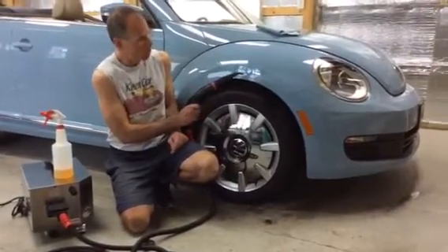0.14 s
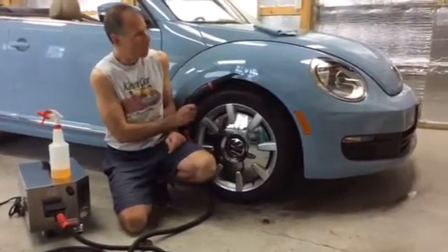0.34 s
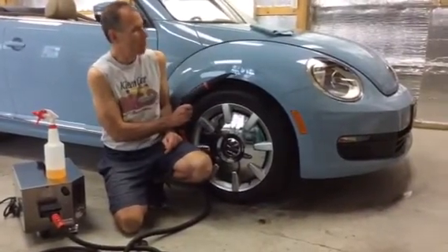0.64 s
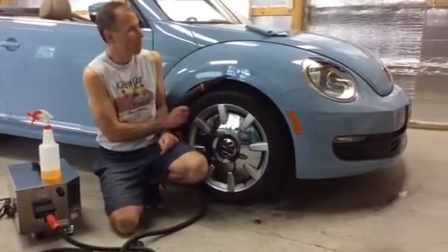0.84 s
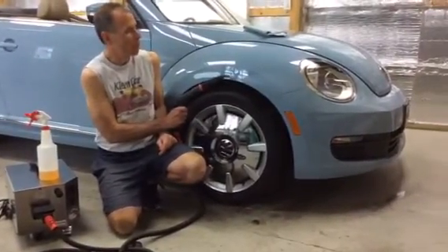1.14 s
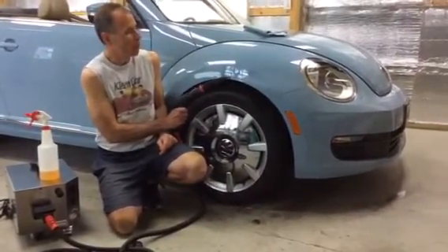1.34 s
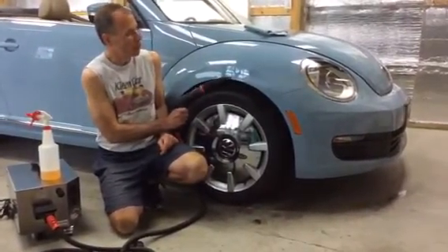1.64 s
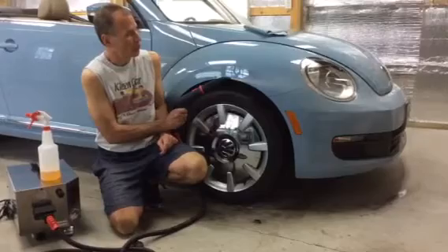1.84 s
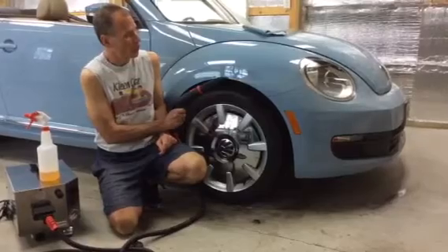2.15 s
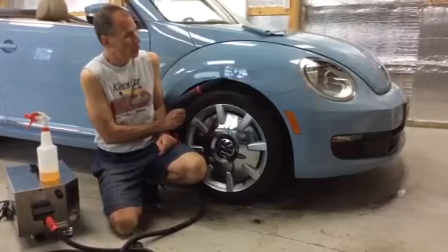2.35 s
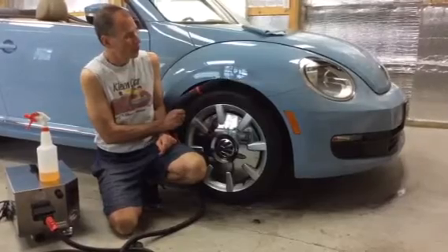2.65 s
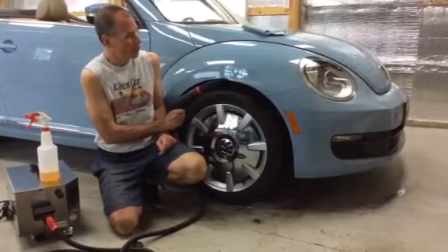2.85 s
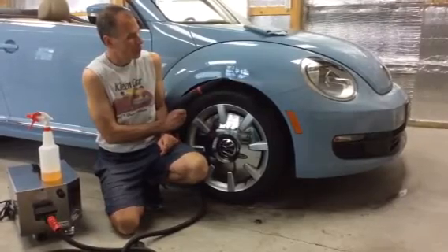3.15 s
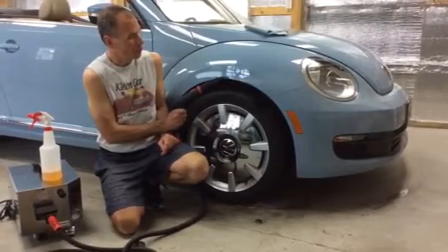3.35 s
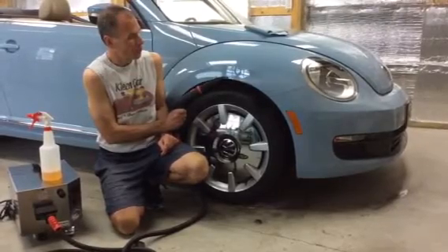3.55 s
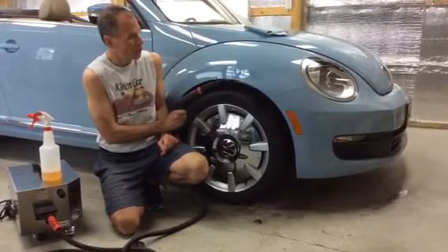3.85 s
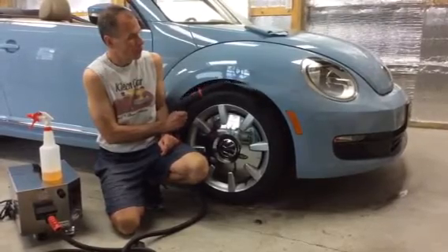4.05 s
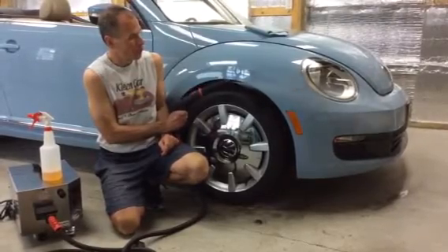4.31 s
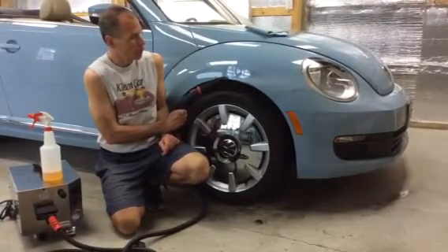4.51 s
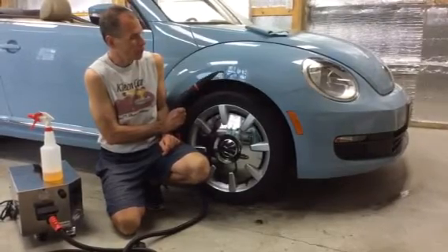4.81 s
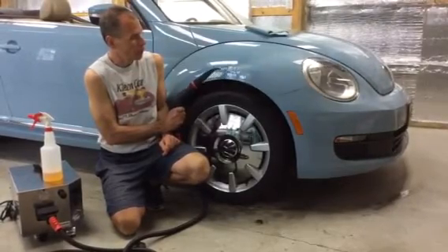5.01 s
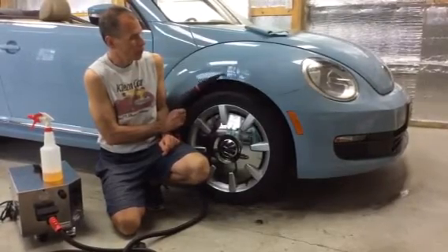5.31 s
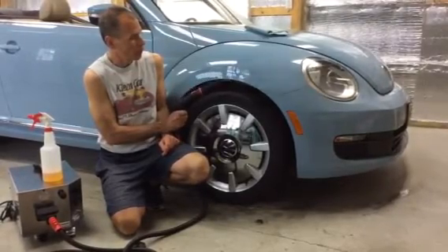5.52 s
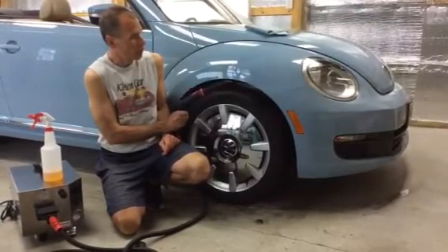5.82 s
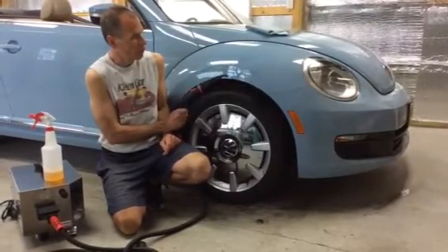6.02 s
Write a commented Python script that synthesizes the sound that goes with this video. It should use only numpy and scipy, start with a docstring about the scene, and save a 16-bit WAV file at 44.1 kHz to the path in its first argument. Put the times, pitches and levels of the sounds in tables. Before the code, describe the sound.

A steam cleaner nozzle hisses hard and high inside a car's wheel arch for about six seconds, sputtering slightly, its spray ringing on metal above a softer airy roar. A faint garage rumble lies underneath. In the first half second, air spilling from the arch thuds lightly on the microphone. From about 0.8 seconds the tone of the hiss drifts as the nozzle moves, and the flow surges and sags, with brief dips near 1.4, 1.8, 3 and 4.5 seconds. Harder thuds hit the microphone around 3.6 seconds. From 4.8 to 5.5 seconds strong gusts rumble and flutter on it, broken at 5 seconds by the deepest dip in the steam; right after that the hiss is at its loudest. One more gust buffets the microphone at 6 seconds, with the steam still hissing to the end.

```python
"""A steam lance hisses inside a car's wheel arch in a garage, its spray ringing on the metal. At first
the draught spilling from the arch thuds lightly on a microphone. From about 0.8 s the colour drifts as
the lance moves, and the flow surges and sags. Harder thuds come near 3.6 s. Around 5 s strong gusts
rumble, broken by the deepest sag, and the hiss peaks. One more gust comes at 6 s, just before the end."""
import sys
import numpy as np
from scipy import signal
from scipy.fft import rfft, irfft, next_fast_len
from scipy.io import wavfile
from scipy.ndimage import uniform_filter1d, map_coordinates

SR = 44100
rng = np.random.default_rng(int(sys.argv[2]) if len(sys.argv) > 2 else 0)


def put_to_file(sound):
    """Save the sound as 16-bit audio at rate SR, in the file named by the first command-line argument."""
    columns = np.atleast_2d(sound).T  # one column per channel
    safe = np.clip(columns, -1, 1)
    whole_steps = np.round(safe * 32767)
    wavfile.write(sys.argv[1], SR, whole_steps.astype(np.int16))


N = 272097

# How loud the steam's three sounds are: time_s, nozzle_db, spray_db, roar_db
STEAM_LEVELS = [(0, -25.5, -36.5, -48.5), (.15, -22.5, -32, -45.5), (.65, -24, -32, -45),
                (.8, -23.5, -30, -40.5), (.92, -23.5, -30.5, -39.5), (1.05, -24, -31, -44.5),
                (1.35, -22.5, -30, -40), (1.7, -24, -29, -39), (2.2, -22.5, -29.5, -42),
                (2.6, -24, -31, -45), (3.2, -23, -28.5, -38), (3.5, -22.5, -29, -42),
                (3.9, -24, -32.5, -46.5), (4.2, -24.5, -28.5, -42.5), (4.35, -23, -28, -41.5),
                (4.6, -23.5, -28, -39), (4.85, -20.5, -29, -39.5), (5.22, -19.5, -28, -38),
                (5.42, -22, -31, -39), (5.55, -25.5, -32, -45), (5.82, -23.5, -29.5, -43.5),
                (5.98, -25, -34, -48.5), (6.08, -22, -31.5, -42), (6.17, -22.5, -31, -40.5)]
# Moments when the sound sags, as the flow falters or the lance swings off the metal: deepest_s, nozzle_loss_db,
# spray_loss_db, draught_loss_db, recovery_s
SAGS = [(.62, .5, 1.5, 0, .05), (.81, 2.5, -0.5, 6, 0.048), (1.1, 0.5, 4, 2, 0.048),
        (1.42, 6, 4.5, 15, 0.12), (1.76, 4.5, 3.5, 10, 0.045), (1.82, 4.5, 3.5, 15, 0.073),
        (2.27, 2, 6.5, 8, 0.077), (2.47, 1.5, 4.5, 3, 0.049), (2.63, 0, 0.5, 6, 0.02),
        (2.8, 1.5, 4, 0, 0.016), (2.95, 9, 4, 20, 0.094), (3.24, 3, 0, 24, 0.15),
        (3.92, 1, 3.5, 2, 0.053), (4.51, 4.5, 4.5, 17, .09), (4.62, 3, 1.5, 10, 0.045),
        (4.968, 12.5, 9, 27, 0.12), (5.1, 5.5, 2.5, 9, 0.048), (5.51, 2, 2.5, 4, 0.034),
        (5.63, 1, 3, 2, 0.07), (5.96, 0.5, 1, 3, .06)]
# Colour (the mix of low and high pitches) of the nozzle's hiss: pitch_hz, level_db
NOZZLE_COLOUR = [(4120, -36.5), (7000, -10), (7820, -3), (9460, -2.5), (10500, -4.5), (14100, -5.5),
                 (15300, -8.5)]
# Colour of the spray, one list for each metal part it hits: pitch_hz, level_db
SPRAY_COLOURS = [
    [(1530, -31), (2600, -10), (3070, -6.5), (3430, -2.5), (3710, -3), (4030, -1), (5300, -2), (5670, 0.5),
     (7000, -4), (9100, -26), (15400, -120)],
    [(1530, -46), (2600, -9), (3070, -5), (3380, 0.5), (3710, -1.5), (4000, -1), (4780, -3), (5410, -1),
     (7000, -3), (9100, -26), (15400, -120)],
    [(1530, -25.5), (2600, -11.5), (2770, -4.5), (3090, -9.5), (3380, -4), (3920, -5.5), (4220, 0),
     (4570, -4.5), (4900, -0.5), (5500, -4.5), (7000, -5), (9100, -12), (15400, -120)],
    [(1530, -29), (2600, -11), (2900, -8.5), (3210, -10.5), (3430, -5.5), (4070, -4), (4420, 1), (4800, -8),
     (5090, 2), (5410, -3), (5880, 0), (7000, -8.5), (9100, -34), (15400, -120)],
]
# Where the lance points: start_s, part_number
LANCE_AIM = [(0, 0), (.77, 1), (1.42, 2), (3.93, 3), (4.5, 0), (5.62, 3), (5.97, 0)]
# Colour of the roar in the arch: pitch_hz, level_db
ROAR_COLOUR = [(350, -37), (600, -8), (1040, -5.5), (1630, -3), (1890, 2), (2510, -1.5), (2600, 1.5),
               (3380, -9), (5720, -120)]
# Echoes from tyre, arch and floor: delay_ms, level_db
ECHOES = [(0.623, -23), (1.427, -20.5), (3.3, -22.5)]
# Strength of the draught at the microphone: time_s, level_db
DRAUGHT_LEVELS = [(0, -65), (.1, -43.5), (.19, -36.5), (.29, -46), (.38, -40.5), (.46, -46), (.57, -39),
                  (.66, -47), (.88, -60), (.94, -46.5), (1.15, -55.5), (1.35, -50), (1.5, -54), (1.67, -46),
                  (1.9, -54), (2.04, -44), (2.4, -45.5), (2.7, -42), (2.76, -51.5), (2.83, -46),
                  (3.05, -53), (3.2, -41.5), (3.37, -37.5), (3.76, -37), (3.9, -47.5), (4.02, -46),
                  (4.19, -59), (4.45, -45.5), (4.74, -41), (4.8, -28.5), (4.9, -22.5), (4.95, -36),
                  (5.1, -38.5), (5.15, -27.5), (5.27, -24.5), (5.46, -26), (5.55, -37.5), (5.66, -50),
                  (5.9, -49), (6.0, -43), (6.08, -30), (6.17, -30.5)]
# Single large eddies (swirls of air): time_s, level_db, direction (push +1, suck -1), width_ms
BIG_EDDIES = [(0.176, -19, 1, 1.6), (0.185, -18, -1, 1.7), (0.196, -13.5, -1, 0.64),
              (0.2286, -20, -1, 0.91), (0.262, -17.5, 1, 0.79), (0.3329, -25, 1, 0.9),
              (0.3712, -23, 1, 0.93), (0.3942, -18.5, 1, 0.44), (0.5066, -25, -1, 0.81),
              (0.561, -21, 1, 1.2), (0.582, -18, 1, 0.35), (0.9148, -26, -1, 1.1), (0.9899, -28, -1, 0.9),
              (1.6737, -23, -1, 1.4), (1.8776, -29, 1, 0.7), (2.0411, -28, -1, 0.96),
              (2.2987, -26, 1, 0.79), (2.391, -22.5, -1, 1.6), (2.479, -19.5, 1, 1.5),
              (2.5302, -21, -1, 0.61), (2.5603, -23, 1, 0.9), (2.695, -23, -1, 0.75),
              (3.1801, -16, -1, 0.94), (3.3607, -13, 1, 0.74), (3.448, -15.5, 1, 0.81),
              (3.4647, -15, -1, 0.71), (3.479, -14, -1, 0.47), (3.536, -17, -1, 1.3),
              (3.562, -16.5, -1, 0.92), (3.593, -14, 1, 1.1), (3.646, -6, 1, 0.59), (3.6775, -9, -1, 0.62),
              (3.7014, -20, 1, 0.68), (3.7575, -9.5, 1, 1.07), (3.8377, -23, -1, 0.41),
              (4.0183, -27, -1, 0.9), (4.359, -27, -1, 1.5), (4.4619, -27.5, 1, 1.3),
              (4.6478, -26, -1, 0.9), (4.6996, -26, 1, 0.9), (4.726, -21, 1, 0.93), (4.7656, -13, 1, 0.68),
              (4.7933, -10.5, 1, 1.1), (4.8013, -11.5, 1, 0.79), (4.8321, -4.5, -1, 0.57),
              (4.865, -10, 1, 0.84), (4.869, -9, 1, 0.83), (4.8916, -5, 1, 0.58), (4.9201, -10, 1, 0.79),
              (5.1368, -7, 1, 1.1), (5.1692, -10, 1, 0.9), (5.22, -10, 1, 0.35), (5.2278, -3, -1, 0.58),
              (5.2581, -3, 1, 0.48), (5.297, -12, -1, 0.68), (5.309, -4, 1, 0.54), (5.401, -17, 1, 0.56),
              (5.4502, -12, 1, 0.47), (5.4763, -15, -1, 1), (5.5008, -13, 1, 0.5), (5.5334, -14.5, -1, 1),
              (5.6102, -20, 1, 0.64), (5.991, -20.5, -1, 0.61), (6.0735, -11, -1, 0.53),
              (6.0829, -4, -1, 0.76), (6.0919, -9, 1, 0.47), (6.127, -5, -1, 0.56), (6.154, -6.5, 1, 0.57)]
# How the microphone's opening colours slow and large eddies: pitch_hz, gain_db
MIC_COLOUR = [(10, -47), (30, -14), (60, -1.5), (150, -1.5), (500, -2.5), (1000, -4), (2000, 3),
              (8000, -30)]
# Colour given to the small, fast eddies: pitch_hz, gain_db
FLUTTER_COLOUR = [(60, -30), (150, 0), (300, 3), (470, 5), (830, -3), (1600, -21), (3000, -54)]
# Colour of the room's rumble: pitch_hz, level_db
GARAGE_COLOUR = [(15, -38), (25, -6), (59, 24), (85, 23), (461, -37), (700, -6), (910, -29), (1540, -120)]


def steam_jet():
    """Hiss, spray and roar sputter together as slugs of water pass the nozzle; near surfaces echo them."""
    nozzle_db, spray_db, roar_db = curves(STEAM_LEVELS)
    nozzle_loss_db, spray_loss_db, _ = sag_losses()
    sputter_db = 0.22 * wobble(22) + 0.28 * wobble(60) + 0.53 * wobble(250)
    hiss = amp(nozzle_db - nozzle_loss_db + sputter_db) * rush(NOZZLE_COLOUR, fine_db=3.5, broad_db=0.27)
    spray = amp(spray_db - spray_loss_db + 1.25 * sputter_db) * spray_on_metal()
    roar_gain = amp(roar_db - 0.57 * spray_loss_db + 1.7 * sputter_db)
    roar = roar_gain * rush(ROAR_COLOUR, fine_db=4.0, broad_db=-0.1)
    echoes = lambda hz: sum(amp(db) * np.exp(-2j * np.pi * hz * ms / 1000) for ms, db in ECHOES)
    return filtered(hiss + spray + roar, lambda hz: 1 + echoes(hz))


def spray_on_metal():
    """Each part rings in its own colour; the lance glides from one to the next in 1/12 s."""
    start_s, parts = np.transpose(LANCE_AIM)
    aim = parts[np.searchsorted(start_s, np.arange(N) / SR, "right") - 1]
    share = lambda part: np.abs(uniform_filter1d(1. * (aim == part), SR // 12))
    return sum(np.sqrt(share(part)) * rush(colour, fine_db=3.5, broad_db=0.58)
               for part, colour in enumerate(SPRAY_COLOURS))


def sag_losses(fall_s=0.042):
    """The flow falters, or the lance swings off the metal, and recovers: decibels lost by the nozzle, the spray
    and the draught."""
    deepest_s, *loss_db, recovery_s = np.transpose(SAGS)
    t = np.arange(N) / SR - deepest_s[:, None]
    width_s = np.where(t < 0, fall_s, recovery_s[:, None])
    return loss_db @ np.exp(-2 * (t / width_s) ** 2)


def draught(strong_db=-35.5, flutter_floor_db=-59.5):
    """Eddies hit the microphone: broad slow ones in a light draught, a dense flutter in a strong one."""
    strength_db = curves(DRAUGHT_LEVELS)[0] - sag_losses()[2]
    excess_db = np.maximum(strength_db - strong_db, 0)
    gust_db = 3 * wobble(16) * amp(-2 * excess_db)  # random gusts fade as the draught turns strong
    light_db = strength_db - excess_db + gust_db
    slow_db = light_db + 0.4 * excess_db
    flutter_db = np.maximum(light_db - 4 + 1.4 * excess_db, flutter_floor_db)
    slow = amp(1.4 * wobble(30)) * coloured(eddies(900, width_ms=1.53, uneven_db=4.0), MIC_COLOUR)
    flutter = amp(2.0 * wobble(60)) * coloured(eddies(4500, width_ms=0.14, uneven_db=3.5), FLUTTER_COLOUR)
    return amp(slow_db) * unit(slow) + amp(flutter_db) * unit(flutter) + thuds()


def thuds():
    """Each large eddy gives the microphone one push or suck."""
    time_s, level_db, direction, width_ms = np.transpose(BIG_EDDIES)
    return coloured(pressure_bumps(time_s, direction * amp(level_db), width_ms), MIC_COLOUR)


def eddies(count, width_ms, uneven_db):
    """Random pushes and sucks of air, a few strong ones among many weak."""
    when, strength, breadth = rng.random((count, 3)).T
    spread = 2 * strength - 1
    size = np.sign(spread) * amp(-uneven_db * np.log(np.abs(spread) + 0.055))
    return pressure_bumps(when * N / SR, size, width_ms * np.exp(0.89 * (breadth - .5)))


def pressure_bumps(time_s, size, width_ms, fall_stretch=1.4, rim_area=0.58, rim_stretch=5.3):
    """An eddy's pressure rises fast and falls slower, inside a wide, shallow rim of opposite sign."""
    offsets = np.arange(-400, 400)
    widths_away = offsets / (width_ms[:, None] * SR / 1000)
    bell = lambda v: np.exp(-4 * np.log(2) * v ** 2)
    core = bell(widths_away / np.where(widths_away > 0, fall_stretch, 1))
    rim = rim_area / rim_stretch * bell(widths_away / rim_stretch)
    bumps = size[:, None] * (core - rim)
    samples = np.clip(np.round(time_s * SR).astype(int)[:, None] + offsets, 0, N)
    return np.bincount(samples.ravel(), bumps.ravel(), N + 1)[:N]  # overlapping bumps add up


def garage_rumble():
    """The room rumbles faintly under everything."""
    return amp(-61.5) * rush(GARAGE_COLOUR, fine_db=0, broad_db=3)


def rush(colour, fine_db, broad_db):
    """Rushing noise: moving sound paths add fine, slow ripples; churning air adds broad, quick patches."""
    window = dict(nperseg=2048, noverlap=1536)
    grid = signal.stft(rng.standard_normal(N + 2048), **window)[2]  # pitch by time

    def patches(pitch_steps, time_steps):
        smooth_in_pitch = uniform_filter1d(rng.standard_normal(grid.shape), pitch_steps, 0)
        return unit(uniform_filter1d(smooth_in_pitch, time_steps, 1))

    gain = amp(fine_db * patches(2, 24) + broad_db * patches(24, 6))
    noise = signal.istft(grid * gain, **window)[1][:N]
    return unit(coloured(noise, colour))


def coloured(x, colour):
    """Shape a sound with a smooth line through (pitch_hz, level_db) points."""
    pitch_hz, level_db = np.transpose(colour)
    return filtered(x, lambda hz: amp(np.interp(np.log(hz + 1), np.log(pitch_hz + 1), level_db)))


def filtered(x, response):
    """Scale and delay each pitch in x by response(hz)."""
    length = next_fast_len(N + SR // 2)
    return irfft(rfft(x, length) * response(np.fft.rfftfreq(length, 1 / SR)), length)[..., :N]


def curves(rows):
    """One value per sample for each column after the time."""
    time_s, *columns = np.transpose(rows)
    return [np.interp(np.arange(N) / SR, time_s, column) for column in columns]


def wobble(per_s):
    """A smooth curve through per_s random values a second."""
    return map_coordinates(rng.standard_normal(int(N * per_s / SR) + 4), [np.arange(N) * per_s / SR])


def amp(db):
    """Turn decibels into a multiplier."""
    return 10 ** (np.asarray(db) / 20)


def unit(x):
    """Scale x to an average (rms) level of 1."""
    return x / np.sqrt(np.mean(x ** 2) + 1e-20)


def scene():
    """One microphone hears steam, draught and room; left and right are the same."""
    mono = steam_jet() + draught() + garage_rumble()
    return np.array([mono, mono])


def record(dry, top_hz=15300):
    """Cut away the very highest treble."""
    return filtered(dry, lambda hz: hz < top_hz)


dry = scene()
out = record(dry)
put_to_file(out)
```